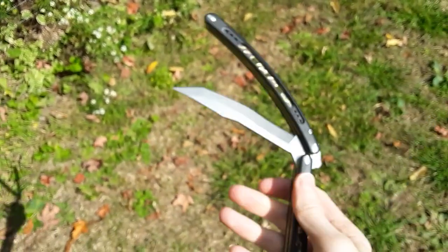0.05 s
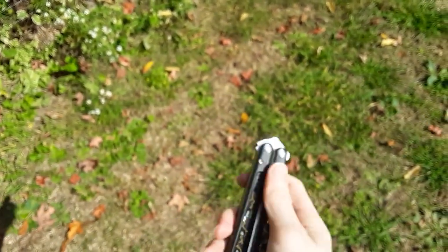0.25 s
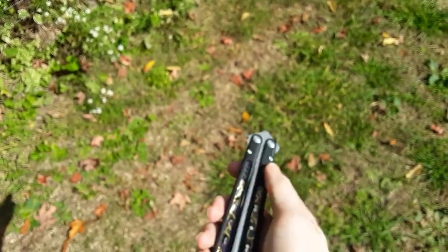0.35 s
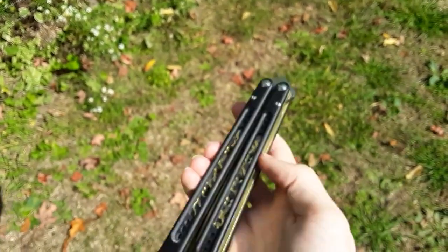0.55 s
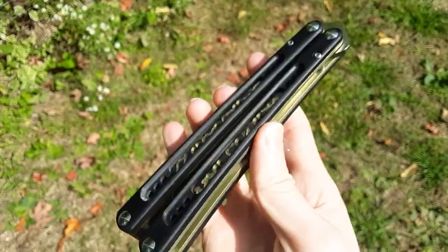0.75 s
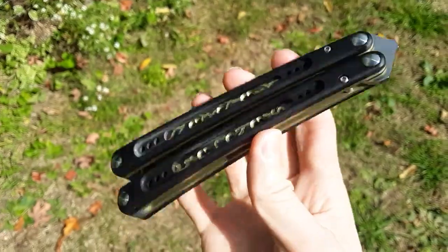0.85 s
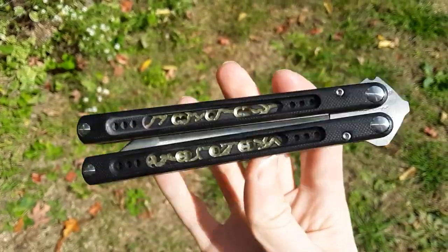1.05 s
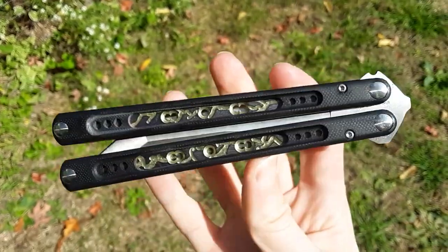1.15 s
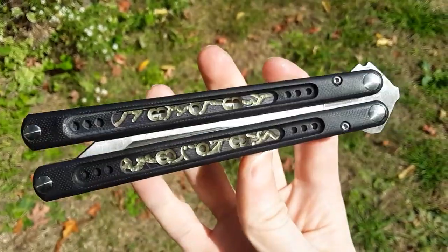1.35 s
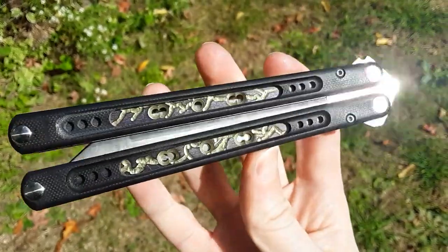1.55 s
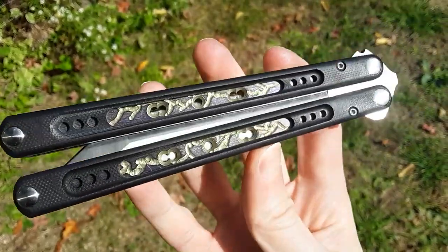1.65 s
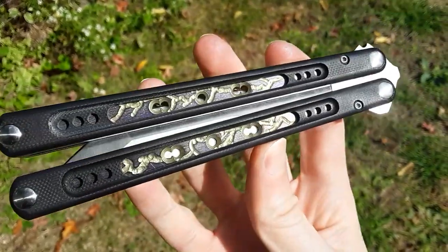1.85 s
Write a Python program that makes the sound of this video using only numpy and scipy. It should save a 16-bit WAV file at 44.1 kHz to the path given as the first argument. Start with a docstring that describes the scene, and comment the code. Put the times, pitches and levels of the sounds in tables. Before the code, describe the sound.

Metal knife handles click and slap together once, close by, while crickets trill outdoors.

```python
"""Crickets rasp and trill in a garden, and almost at once a butterfly knife is flipped shut close by.
One handle clicks against its pin, then the two metal handles slap together and rattle to rest.
The near cricket drags the teeth of one wing over the other, about fifty strokes a second.
A far bird calls three times, and distant machinery hums under the soft outdoor air."""
import sys
import numpy as np
from scipy import signal
from scipy.fft import rfft, irfft
from scipy.io import wavfile

SR = 44100
rng = np.random.default_rng(int(sys.argv[2]) if len(sys.argv) > 2 else 0)


def put_to_file(sound):
    """Save the sound as 16-bit audio at rate SR, in the file named by the first command-line argument."""
    columns = np.atleast_2d(sound).T  # one column per channel
    safe = np.clip(columns, -1, 1)
    whole_steps = np.round(safe * 32767)
    wavfile.write(sys.argv[1], SR, whole_steps.astype(np.int16))


N = 83790
T = np.arange(N) / SR


def amp(db):
    """Decibels to gain."""
    return 10 ** (np.asarray(db) / 20)


def unit_rms(x):
    """Scales to rms 1."""
    return x / np.sqrt(np.mean(abs(x) ** 2) + 1e-20)


def gain_curve(points):
    """Gain over time from rows of time_s, level_db."""
    return amp(np.interp(T, *np.transpose(points)))


def log_interp(points, hz):
    """Interpolates rows of freq_hz, value on a log axis."""
    freq_hz, value = np.transpose(points)
    return np.interp(np.log(hz + 1), np.log(freq_hz), value)


def add(mix, start_s, sound):
    """Mixes a sound in at start_s."""
    part = mix[:, round(start_s * SR):][:, :sound.shape[-1]]
    part += sound[..., :part.shape[1]]


def bandpass(x, low_hz, high_hz):
    """Butterworth band-pass, capped below Nyquist."""
    sos = signal.butter(3, [low_hz, min(high_hz, .48 * SR)], "band", fs=SR, output="sos")
    return signal.sosfilt(sos, x)


def narrow_noise(hz, width_hz):
    """Complex noise band of rms 1: a wavering tone."""
    freq_hz = np.fft.fftfreq(N, 1 / SR)
    spectrum = rng.standard_normal(N) + 1j * rng.standard_normal(N)
    return unit_rms(np.fft.ifft(spectrum / (1 + (2 * (freq_hz - hz) / width_hz) ** 4)))


# freq_hz, width_hz, level_re_air_db
HUM_BANDS = [(56, 2.7, -16.5), (102.5, 7.9, -13.5), (129.8, 4.5, -10), (362.6, 18.4, -18)]


def machinery_hum():
    """Distant machinery: low, wavering tones."""
    return sum(amp(db) * unit_rms(narrow_noise(hz, width_hz).real) for hz, width_hz, db in HUM_BANDS)


# freq_hz, relative_density_db
AIR_SPECTRUM = [(20, -40), (32, 2), (45, -19), (60, -2), (130, 0.5), (200, -7), (400, -8), (700, -10),
                (1250, -15), (2100, -14.5), (2700, -21), (6000, -22), (9000, -18.5), (10500, -67),
                (13000, -36.5), (16000, -37)]
# freq_hz, stereo_correlation
AIR_CORRELATION = [(60, .8), (200, 0.88), (400, 0.58), (700, -0.098), (1300, -0.68), (2400, 0.23),
                   (8000, 0.17)]
# time_s, level_db
BACKGROUND_LEVEL = [(0, -52.5), (.2, -52.5), (.45, -55.5), (.8, -56.5), (1.1, -57.5), (1.35, -56.5),
                    (1.55, -53.5), (1.9, -52)]


def outdoor_air():
    """Soft rumble and hiss that dip and recover together with the hum."""
    hz = np.fft.rfftfreq(N, 1 / SR)
    left, other = rfft(rng.standard_normal((2, N)))
    correlation = log_interp(AIR_CORRELATION, hz)
    right = correlation * left + np.sqrt(1 - correlation ** 2) * other
    wash = unit_rms(irfft(np.array([left, right]) * amp(log_interp(AIR_SPECTRUM, hz)), N))
    return gain_curve(BACKGROUND_LEVEL) * (wash + machinery_hum())


def insect_bands(bands):
    """Narrow bands of insect song, uncorrelated left and right."""
    return sum(np.array([amp(db) * unit_rms(narrow_noise(hz, width_hz).real) for db in sides_db])
               for hz, width_hz, *sides_db in bands)


# freq_hz, width_hz, left_db, right_db
CHORUS_BANDS = [(1730, 150, -68, -68), (2030, 220, -71, -71), (8130, 160, -65, -64), (7020, 450, -68, -63),
                (7700, 600, -65, -65)]


def insect_chorus():
    """Many far insects blur into steady bands that swell with the background."""
    return insect_bands(CHORUS_BANDS) * unit_rms(gain_curve(BACKGROUND_LEVEL)) ** 0.59


# start_s, length_s, level_db, fundamental_hz
BIRD_CALLS = [(-.16, 0.35, -51.5, 904), (0.322, 0.47, -57.5, 900), (.88, .42, -56.5, 900)]
# harmonic, gain_db
BIRD_PARTIALS = [(3, -11), (4, 5.5), (5, -13), (6, -9.5)]


def far_bird():
    """Slightly falling cries, smeared by distance."""
    rise_s, release_s, fade_db, sag_hz_per_s = 0.14, 0.014, -23, 70
    flutter_hz, rasp_hz = 30, 290
    out = np.zeros((2, N))
    for start_s, length_s, level_db, fundamental_hz in BIRD_CALLS:
        t = np.clip(T - start_s, 0, length_s)
        gate = np.minimum(t / rise_s, 1) * np.minimum((length_s - t) / release_s, 1)
        envelope = gate * amp(level_db + fade_db * (t / length_s) ** 2)
        phase = 2 * np.pi * np.cumsum(fundamental_hz - sag_hz_per_s * t) / SR
        blur = [.8 + narrow_noise(0, flutter_hz) + .9 * narrow_noise(0, rasp_hz) for side in "LR"]
        partials = sum(amp(db) * np.exp(1j * harmonic * phase) for harmonic, db in BIRD_PARTIALS)
        out += envelope * np.sqrt(2) * (unit_rms(np.array(blur)) * partials).real
    return out


# freq_hz, width_hz, left_db, right_db
CHIRP_SONG = [(7500, 290, -69, -60), (8340, 180, -66, -79), (9340, 600, -70, -78)]


def chirping_cricket():
    """A high song that swells about four times a second."""
    period_s, peak_s, swing_db = .239, .16, 8.5
    swell = unit_rms(amp(swing_db * np.cos(2 * np.pi * (T - peak_s) / period_s)))
    return insect_bands(CHIRP_SONG) * swell * unit_rms(gain_curve(BACKGROUND_LEVEL)) ** 0.89


# time_s, level_db
NEAR_CRICKET_LEVEL = [(0, -50.5), (.18, -50.5), (.4, -54.5), (.8, -54.5), (1.25, -54), (1.6, -49.5),
                      (1.9, -47.5)]


def near_cricket():
    """Each wing stroke drags a row of teeth over a resonance that sags as the wing closes."""
    wingbeat_hz, stroke_duty, teeth_per_s = 50.78, .64, 2600
    resonance_hz, sag_hz, width_hz = 7850, 1108, 1150
    tone_db, overtone_db, left_db = -10, -20.5, -27.5
    stroke = np.minimum((wingbeat_hz * T - .18) % 1 / stroke_duty, 1)
    force = unit_rms(abs(np.sin(np.pi * stroke)) ** .7)
    # The ring is built around 0 Hz, then shifted up to the resonance.
    teeth = (rng.random((2, N)) < teeth_per_s / SR) * np.exp(2j * np.pi * rng.random((2, N)))
    pole = np.exp(-np.pi * width_hz / SR)
    rough_ring = unit_rms(signal.lfilter([1], np.poly([pole, pole]), teeth))
    clean_ring = 1.9 * np.exp(2j * np.pi * narrow_noise(0, wingbeat_hz / 2).real)
    pitch_hz = resonance_hz - sag_hz * stroke ** 2.4
    wing = unit_rms(rough_ring + clean_ring) * np.exp(2j * np.pi * np.cumsum(pitch_hz) / SR)
    tone = amp(tone_db) * narrow_noise(hz=7640, width_hz=35)
    rasp = unit_rms(bandpass(force * (wing + tone).real, low_hz=6100, high_hz=9000))
    overtone = amp(overtone_db) * unit_rms((1 + force) * narrow_noise(hz=15380, width_hz=650).real)
    return amp([[left_db], [0]]) * gain_curve(NEAR_CRICKET_LEVEL) * (rasp + overtone)


# centre_s, half_length_s, level_db
FINGER_RUBS = [(0.757, 0.09, -59.5), (1.51, 0.02, -61)]


def fingers():
    """Skin slides faintly over the handles."""
    pressure = sum(amp(db) * np.exp(-((T - centre_s) / half_s) ** 2)
                   for centre_s, half_s, db in FINGER_RUBS)
    return pressure * unit_rms(bandpass(rng.standard_normal((2, N)), low_hz=1140, high_hz=5600))


# low_hz, high_hz, t60_s, gain_db
SCATTER_BANDS = [(300, 1540, 0.091, -4.5), (2600, 5230, 0.42, -10.5), (6000, 40000, 0.25, -16)]


def scatter(direct, delay_s=0.0039):
    """A brief diffuse tail reflected from hand, body and ground."""
    t, tail = T[:SR // 3], 0
    for low_hz, high_hz, t60_s, gain_db in SCATTER_BANDS:
        taps = rng.standard_normal((2, len(t))) * amp(-60 * t / t60_s) * (t > delay_s)
        tail += amp(gain_db) * bandpass(taps / np.linalg.norm(taps[0]), low_hz, high_hz)
    return signal.fftconvolve(direct.mean(0)[None], tail, axes=1)[:, :N]


# start_s, level_db
HAND_THUDS = [(0.2167, -36), (.2612, -42.5)]


def hand_thuds():
    """The two main blows push into the hand: a sharp tap and a dull, low tone."""
    pitch_hz, t60_s, tap_db, tap_decay_s, right_db = 149, 0.051, 20, 0.0003, -27
    out, t = np.zeros((2, N)), T[:SR // 10]
    tone = amp(-60 * t / t60_s) * np.sin(2 * np.pi * pitch_hz * t)
    tap = amp(tap_db) * np.exp(-t / tap_decay_s)
    for start_s, level_db in HAND_THUDS:
        add(out, start_s, amp([[level_db], [level_db + right_db]]) * (tone + tap))
    return out


# low_hz, high_hz, t60_s, right_db, stereo_correlation; rows: clack, sizzle, tick
RATTLE_BANDS = [(1870, 4060, 0.017, 1, 0.97), (5650, 8480, 0.03, -5.5, 0.24),
                (9400, 15900, 0.012, -3, 0.32)]
# freq_hz, gain_db, t60_s
STEEL_MODES = [(2060, -2, 0.028), (2710, -13, 0.041), (2956, 1, 0.084), (3135, -1, 0.12), (3435, -11, .05),
               (3610, 6, 0.035), (3870, -15, 0.043), (4352, 8.5, 0.031), (6900, 15, 0.033), (7210, 2, .06),
               (7700, -1, 0.042), (12900, -3, .03), (14700, -12, .03)]


def metal_contact(snap_db, snap_hz, snap_rise_s, clack_db, sizzle_db, tick_db, ring_db):
    """Metal meets metal: a snap, a rough rattle, and a hand-damped ring of blade and handles."""
    attack_s, right_delay_s, snap_right_db, ring_right_db = 0.00054, 0.00021, -14, 4
    t = T[:SR // 5]
    attack = np.minimum(t / attack_s, 1)
    pulse = (t / snap_rise_s * np.exp(1 - t / snap_rise_s)) ** 4.5
    snap = amp(snap_db) * pulse * np.sin(2 * np.pi * snap_hz * t)
    out = amp([[0], [snap_right_db]]) * snap
    for level_db, band in zip((clack_db, sizzle_db, tick_db), RATTLE_BANDS):
        low_hz, high_hz, t60_s, right_db, correlation = band
        left, other = unit_rms(bandpass(rng.choice([-1., 1.], (2, len(t))), low_hz, high_hz))
        delayed = np.interp(t - right_delay_s, t, left)
        right = correlation * delayed + np.sqrt(1 - correlation ** 2) * other
        out += np.array([left, amp(right_db) * right]) * attack * amp(level_db - 60 * t / t60_s)
    ring = attack * sum(amp(ring_db + db - 60 * t / t60_s) * np.sin(2 * np.pi * (hz * t + rng.random()))
                        for hz, db, t60_s in STEEL_MODES)
    return out + np.array([ring, amp(ring_right_db) * np.interp(t - right_delay_s, t, ring)])


# start_s, snap_db, snap_hz, snap_rise_s, clack_db, sizzle_db, tick_db, ring_db
KNIFE_CONTACTS = [(.2162, -.3, 7100, .0005, -26, -22, -27, -46),
                  (.2531, -21, 6700, .0006, -30, -25, -26, -50),
                  (.26075, -2.8, 7800, .00072, -18.5, -22, -24, -42),
                  (.2652, -22, 7500, .0005, -24, -24, -18, -48),
                  (.2688, -7.3, 7850, .0008, -20.5, -25, -26, -44),
                  (.2764, -30, 7000, .0007, -29, -30, -32, -54),
                  (.2866, -22, 7800, .0007, -30, -34, -35, -56),
                  (.3142, -29, 7900, .0012, -35, -40, -43, -57)]


def knife():
    """One handle hits its pin, then both slap together and rattle to rest."""
    out = hand_thuds()
    for start_s, *settings in KNIFE_CONTACTS:
        add(out, start_s, metal_contact(*settings))
    return out


def scene():
    """The knife in front of the garden."""
    clicks = knife()
    foreground = clicks + scatter(clicks) + fingers()
    return foreground + near_cricket() + chirping_cricket() + insect_chorus() + far_bird() + outdoor_air()


def record(dry):
    """Full-scale clip, low cut and band limit."""
    low_cut_hz, high_cut_hz = 45, 16450
    highpass = signal.butter(2, low_cut_hz, "high", fs=SR, output="sos")
    lowpass = signal.firwin(255, high_cut_hz, window=("kaiser", 8), fs=SR)
    return signal.oaconvolve(signal.sosfilt(highpass, np.clip(dry, -1, 1)), lowpass[None], "same")


dry = scene()
out = record(dry)
put_to_file(out)
```